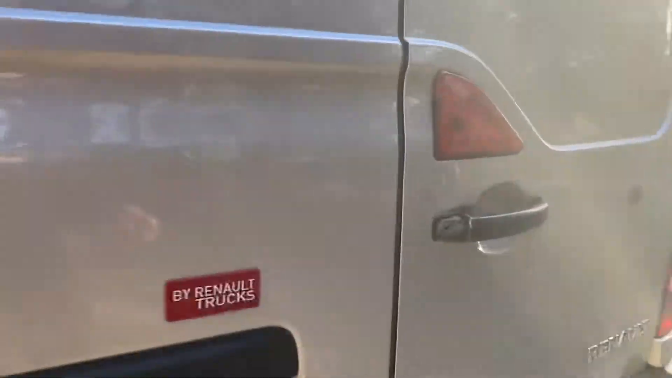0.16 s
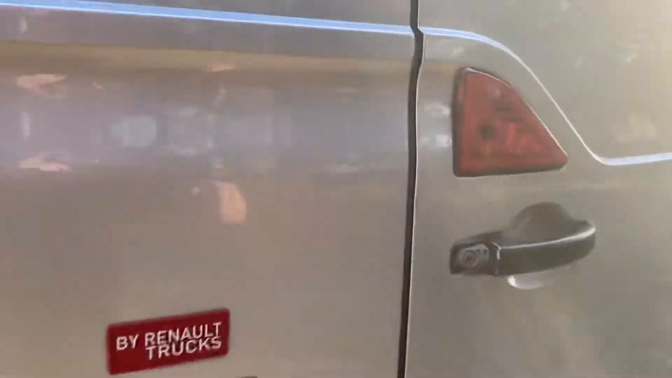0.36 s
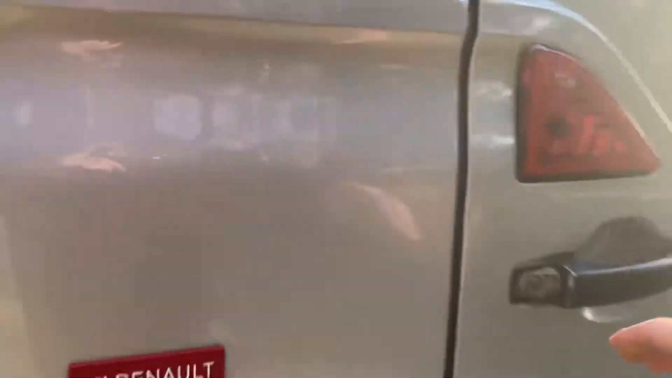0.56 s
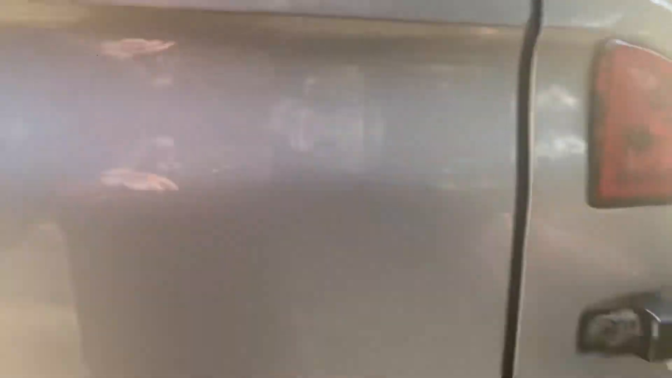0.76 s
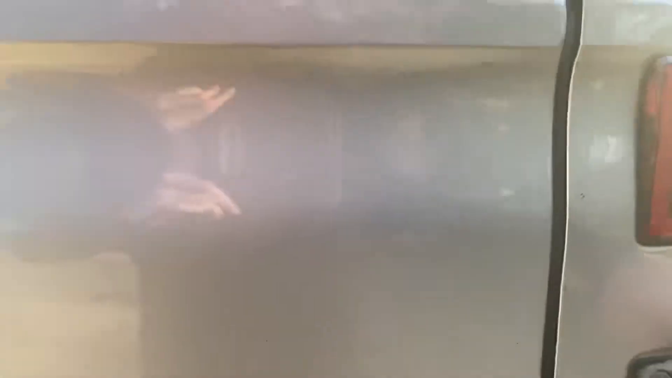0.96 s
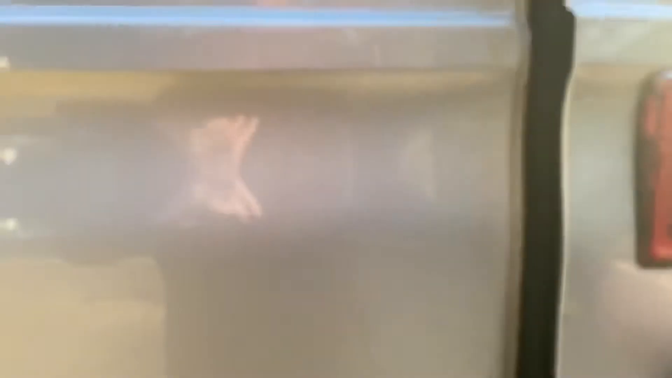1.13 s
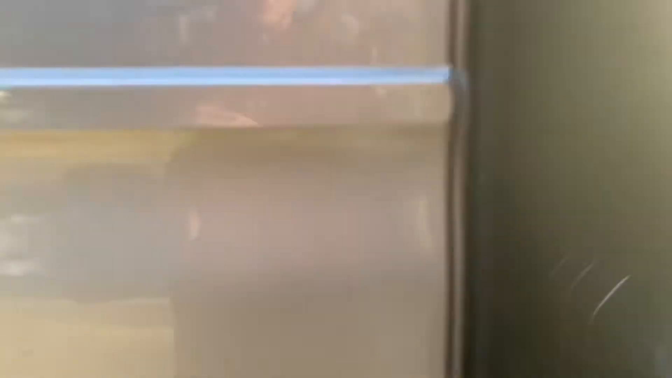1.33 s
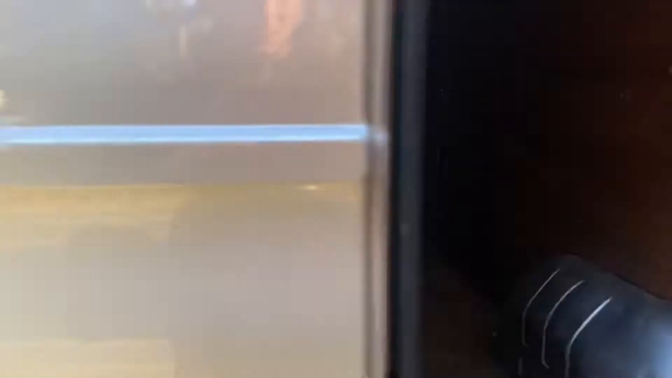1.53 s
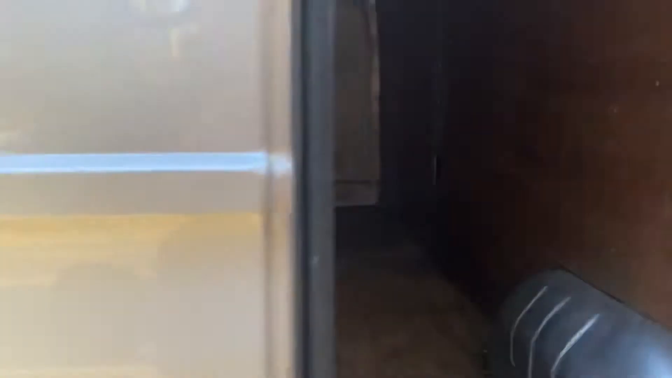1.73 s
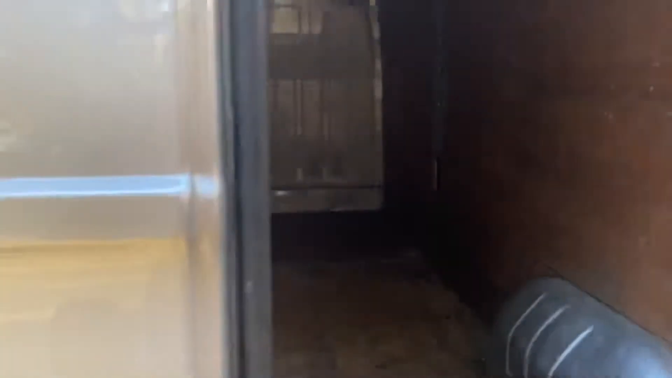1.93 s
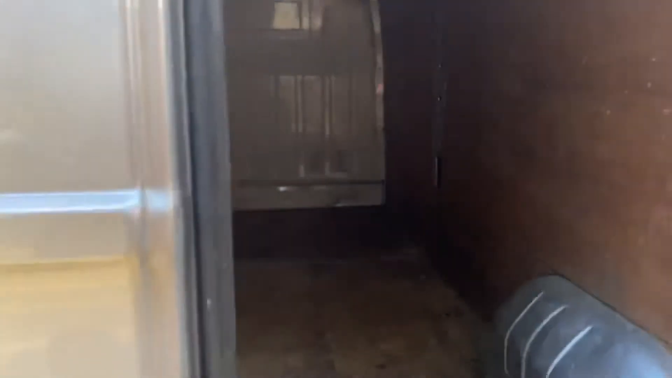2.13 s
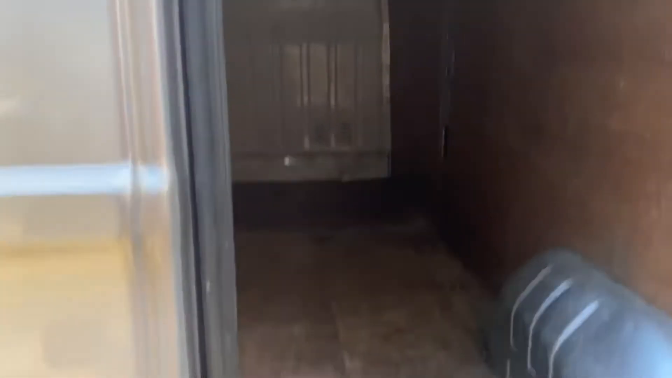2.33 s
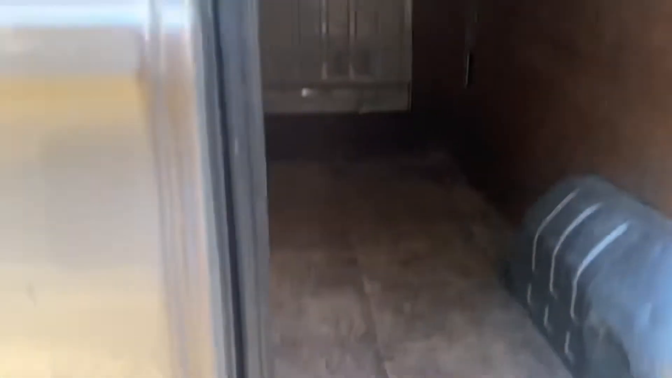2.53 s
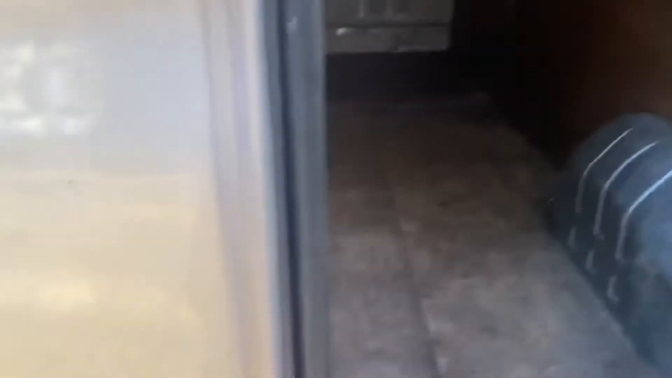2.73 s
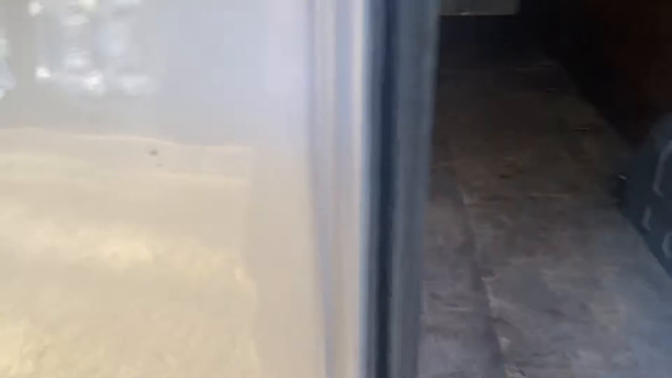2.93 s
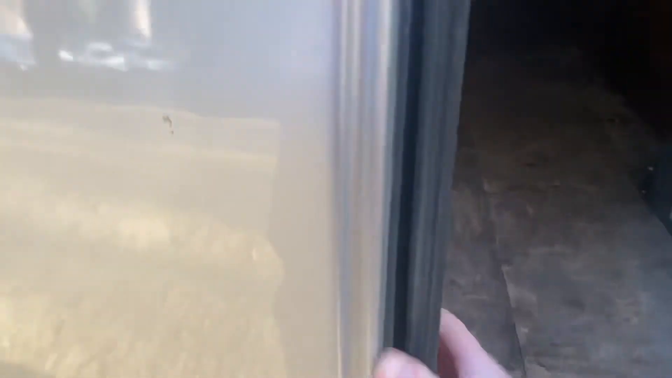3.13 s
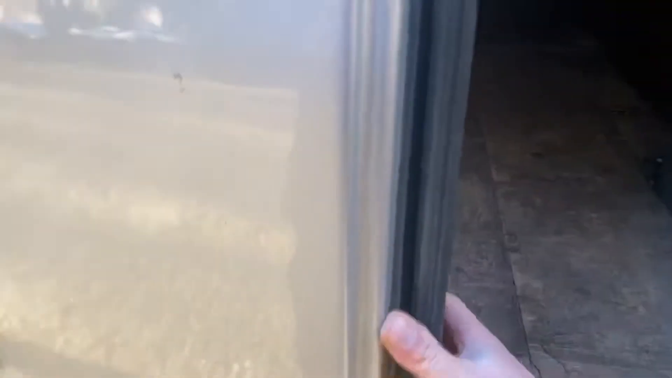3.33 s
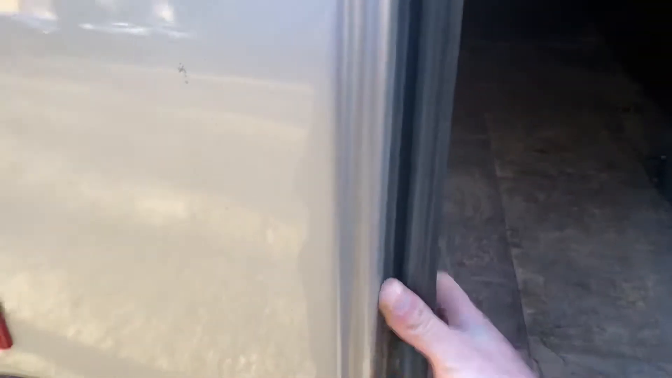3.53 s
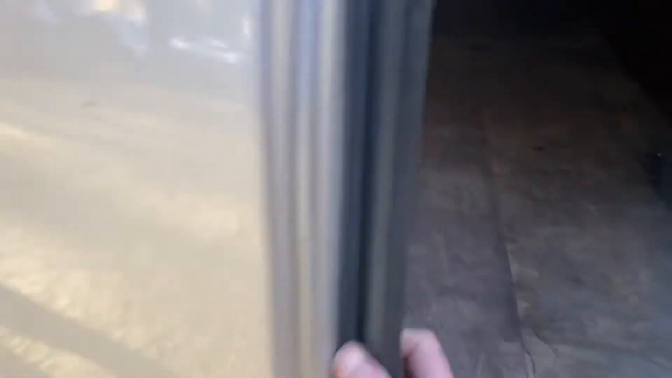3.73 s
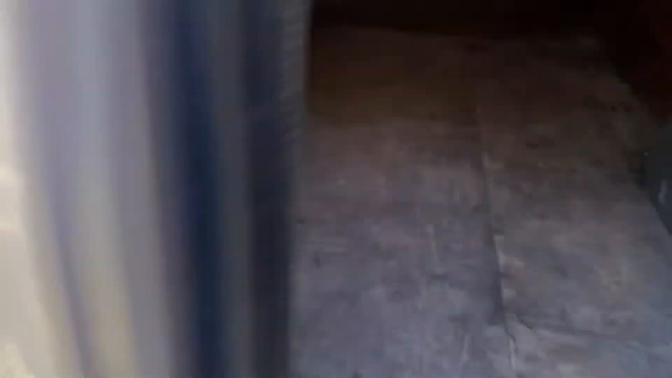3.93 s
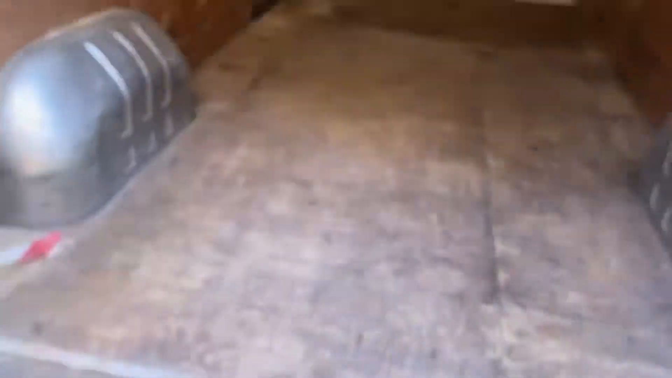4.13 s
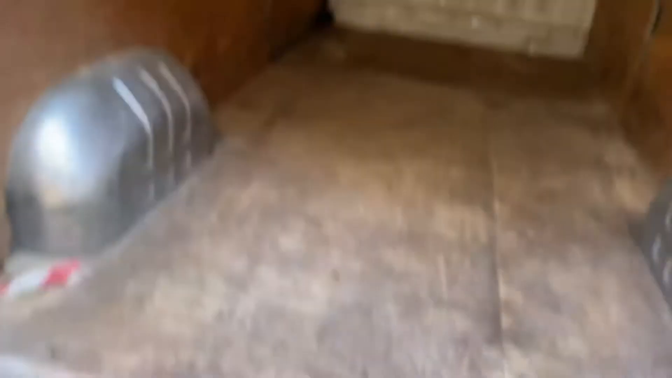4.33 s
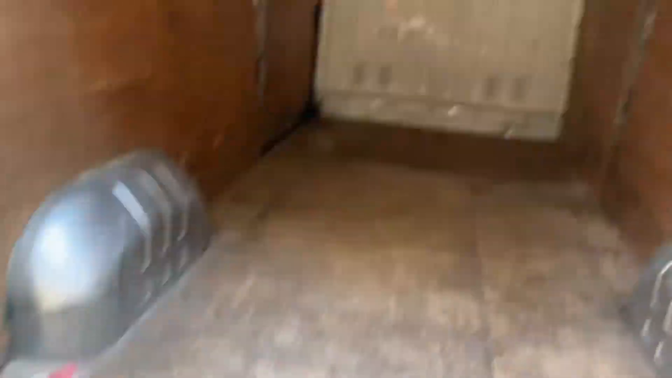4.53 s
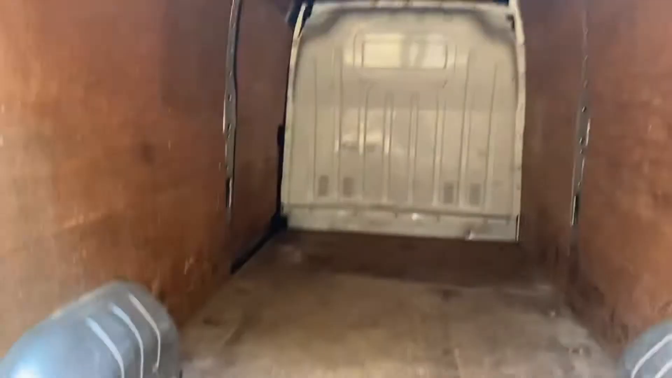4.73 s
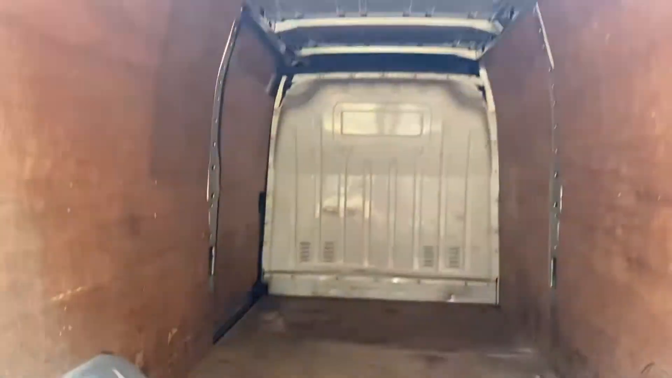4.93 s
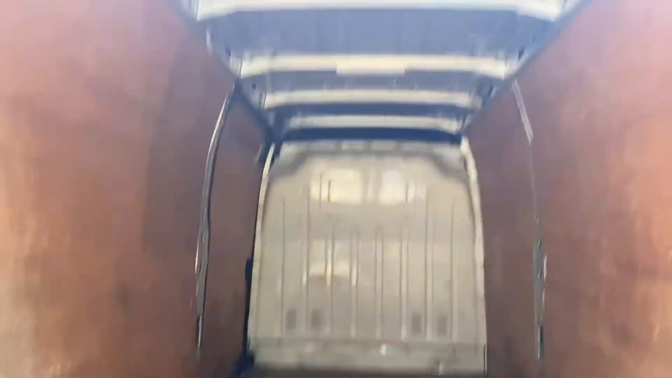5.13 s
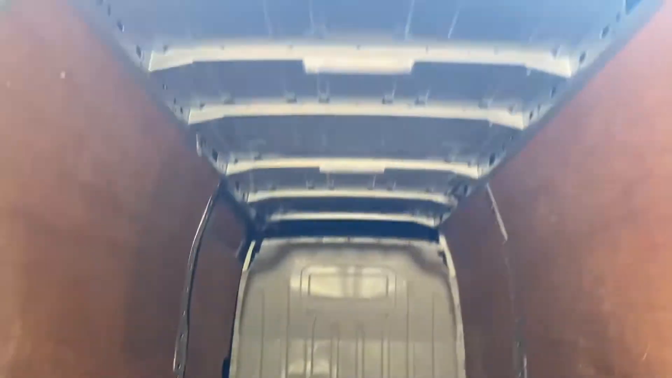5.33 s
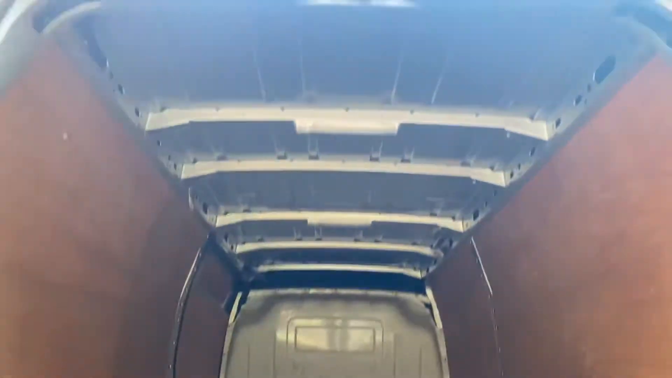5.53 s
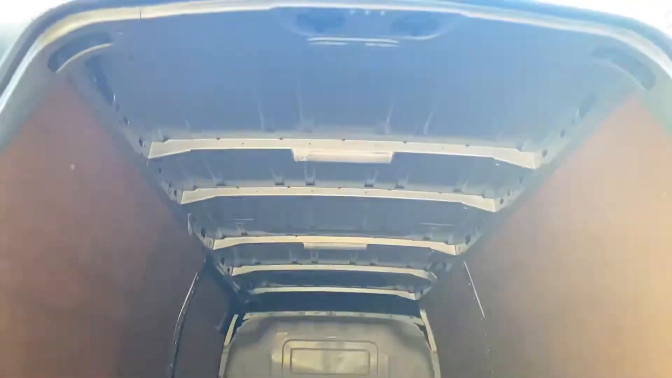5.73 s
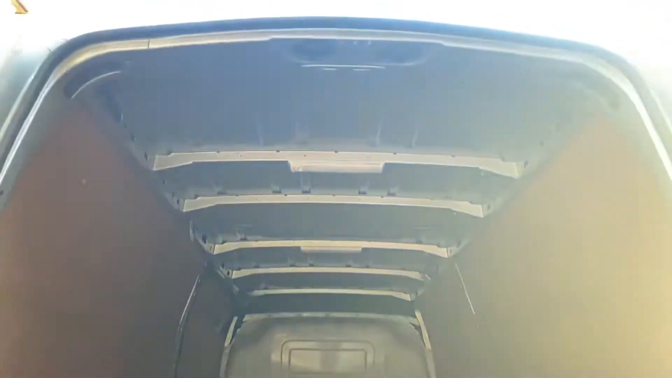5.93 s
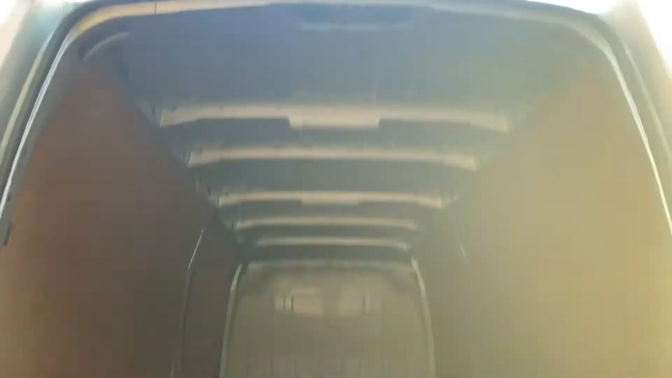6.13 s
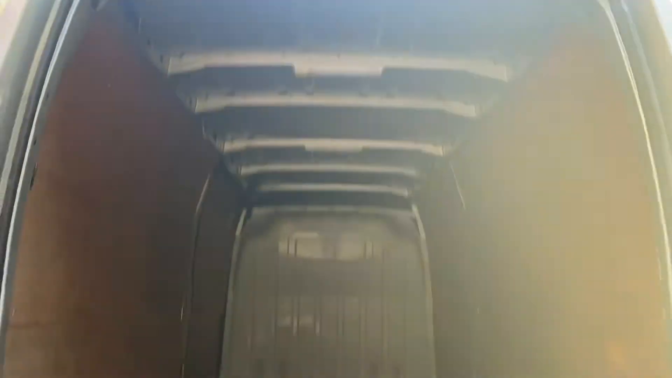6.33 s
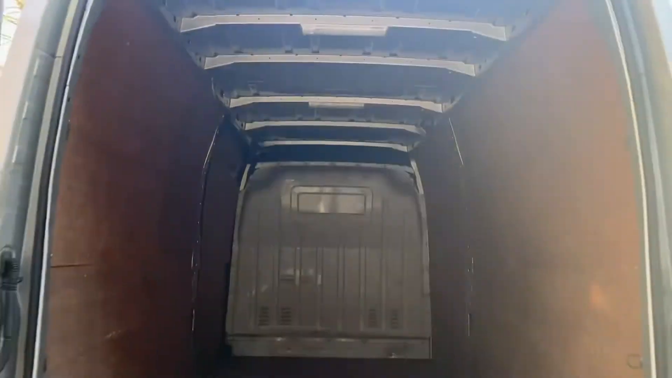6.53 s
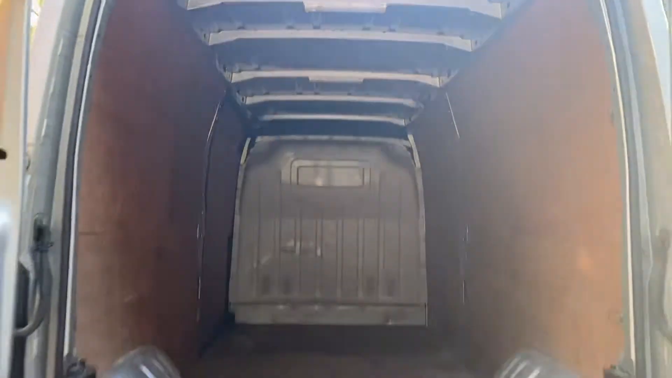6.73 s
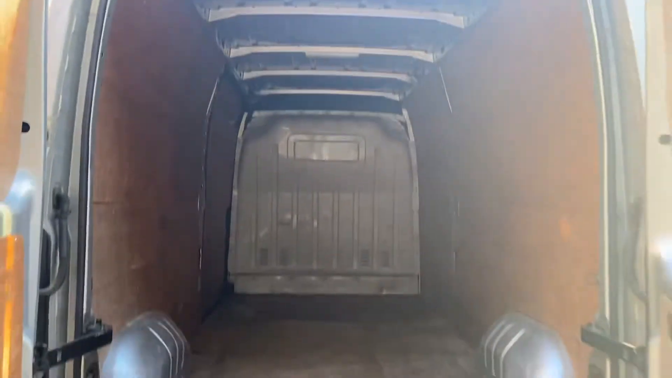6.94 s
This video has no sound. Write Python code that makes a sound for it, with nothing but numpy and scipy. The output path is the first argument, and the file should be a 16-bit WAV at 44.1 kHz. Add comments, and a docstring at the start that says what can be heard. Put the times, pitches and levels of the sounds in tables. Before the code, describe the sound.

Hand-held stereo microphone close to a van's rear doors outside. Faint clicking and rustling, a short dry squeak, then the first door unlatches with a heavy boomy clunk. Low wind buffets the microphone and dies down. The second door's latch snaps brightly, another clunk comes less than a second later, followed by dragging rubs, soft knocks, tiny ticks and a shoe scuff, with low far traffic beneath.

```python
"""Outdoors, close to a hand-held stereo microphone: the two rear doors of an empty van are unlatched and opened.
Handles tick over a low rustle, then the first latch lets go near 1 s with a puff of air; panels and bay ring.
Near 2 s wind thumps and flaps on the microphone; the second clunk at 3.4 s sets a lock part jingling.
A third clunk follows at 4.2 s, then ticks, rubbing and a sole scuffing grit; wind and far traffic lie under it all.
Hard parts are decaying sines, rubs and air are shaped noise; all levels are relative, ahead of trims and record()."""
import sys
import numpy as np
from scipy import signal
from scipy.io import wavfile

SR = 44100
rng = np.random.default_rng(int(sys.argv[2]) if len(sys.argv) > 2 else 0)


def transcribe(u):
    """Save the signal u as a 16-bit wav file named by the first command-line argument.

    u: samples, shape (n,) or (channels, n), limited to [-1, 1]; the rate is SR.
    q: integer samples, one column per channel.
    """
    v = np.clip(np.atleast_2d(u).T, -1, 1)
    q = np.round(v * 32767).astype(np.int16)
    wavfile.write(sys.argv[1], SR, q)


N = 307619
TIME = np.arange(N) / SR


def from_db(db):
    """Decibels to gain."""
    return 10 ** (np.asarray(db) / 20)


def rms_one(x):
    """Scale to unit power."""
    return x / np.sqrt(np.mean(x ** 2) + 1e-20)


def at_hz(points, hz):
    """Read a table on a log-frequency axis."""
    f, value = np.transpose(points)
    return np.interp(np.log(hz), np.log(f), value)


def add(out, s, sound):
    """Mix a sound in at time s."""
    i = int(s * SR)
    out[:, i:i + sound.shape[-1]] += sound[..., :N - i]


def drift(rate):
    """Random wander of unit power, with `rate` new values per second joined by straight lines."""
    knots = rng.standard_normal(4000)
    return rms_one(np.interp(TIME * rate, np.arange(len(knots)), knots))


def swell(peak_s, rise_s, fall_s):
    """A gain that climbs to 1 and sinks again, by 20 dB in each rise or fall time."""
    return from_db(-20 * np.maximum((peak_s - TIME) / rise_s, (TIME - peak_s) / fall_s))


def ring(t, hz, t60):
    """A struck mode: a sine that loses 60 dB in t60 seconds."""
    return np.sin(2 * np.pi * hz * t) * from_db(-60 * t / t60)


def wavering_tone(hz):
    """A sine that follows a changing pitch."""
    return np.sin(2 * np.pi * np.cumsum(hz) / SR)


# third-octave band centres [Hz]
CENTRES = 25 * 2 ** (np.arange(29) / 3)


def noise(colour, width, size, envelope=lambda hz: 1):
    """Stereo noise in third octaves, each under its own envelope; the middle has unit power at envelope 1."""
    lowest, highest = colour[0][0] * 0.85, colour[-1][0] * 1.15
    centres = CENTRES[(CENTRES > lowest) & (CENTRES < highest)]
    white = rng.standard_normal((2, 2, size))   # neighbouring bands take turns with two independent pairs
    out, power = np.zeros((2, size)), 0
    for k, hz in enumerate(centres):
        low, high = hz * 2 ** (-1 / 6), hz * 2 ** (1 / 6)
        gain = from_db(at_hz(colour, hz))
        band = signal.butter(2, [low, high], "band", fs=SR, output="sos")
        mid, side = signal.sosfilt(band, white[k % 2] * envelope(hz) + 1e-18) * gain
        side = side * from_db(at_hz(width, hz))
        out += [mid + side, mid - side]
        power += gain ** 2 * (high - low) * 2 / SR
    return out / np.sqrt(power)


# modes of the struck steel panels, one list per clunk: (frequency [Hz], level [dB])
PANELS = [
    [(355, -6.5), (424, 2.5), (562, -13.5), (705, -1), (899, -2), (1070, 3), (1190, -28), (1836, -9)],
    [(829, -5), (1136, -8.5), (1229, -12), (1297, -19), (1389, -8), (1583, -7), (1920, -34), (2099, -14),
     (2417, -15), (3018, -17)],
    [(791, -11), (872, 0), (1070, -4.5), (1357, -17), (1440, -4.5), (1818, -9), (1990, -1.5), (2468, -7),
     (2896, -19), (3192, -16)],
]
BOTH_DOORS = PANELS[0] + PANELS[1]


def panel(modes, t60, uneven_db=5.5):
    """Struck sheet steel: its modes set in one after another and reach each port by their own path."""
    out = 0
    for hz, db in modes:
        lag = rng.uniform(0, 0.00368) + rng.uniform(0, 0.00065, (2, 1))   # s, shared and per port
        gain = from_db(db + uneven_db * rng.standard_normal((2, 1)))
        out = out + gain * ring(np.maximum(TIME[:SR] - lag, 0), hz, t60)
    return out


# the three clunks: (time [s], clatter level [dB], clatter decay t60 [s], body level [dB],
#                    factor on the bay's t60, panel level [dB], lingering ring against the body [dB])
CLUNKS = [(0.998, -1, 0.096, -11.5, 0.55, -26.5, -12), (3.4491, -11, 0.087, -11, 0.77, -19.5, -22),
          (4.2190, -9, 0.044, -12, 0.49, -23.5, -26)]
# colour of the clatter, one list per clunk: (frequency [Hz], density [dB per Hz])
CLATTER_COLOUR = [
    [(35, -27), (60, -1), (189, 1.5), (800, -19.5), (1200, -12.5), (1800, -24), (3040, -31.5), (3760, -44),
     (4750, -43), (15000, -56)],
    [(60, -18), (100, 4), (470, 2), (620, 1), (1400, -3), (2270, -2.5), (3120, -13), (7100, -37),
     (10000, -25.5), (15000, -27)],
    [(90, -6), (150, -41), (466, 1.5), (1260, -28), (1530, -10.5), (3040, -15), (7000, -33.5), (10600, -29),
     (15000, -36)],
]
# colour of the body's ring, one list per clunk: (frequency [Hz], density [dB per Hz])
BODY_COLOUR = [
    [(30, -35), (45, -2), (155, 0), (354, -17), (615, -22), (770, -20), (1900, -23.5), (2600, -36),
     (4800, -47), (15000, -96)],
    [(35, -14), (118, -5), (297, -3.5), (600, -20.5), (1410, -12), (1680, -21), (2380, -20), (3830, -41.5),
     (6170, -34.5), (8000, -46.5), (10200, -42.5), (15000, -70)],
    [(60, -33), (100, -60), (249, -2), (676, -20.5), (800, -15.5), (2000, -18), (5530, -35), (9200, -42),
     (15000, -54)],
]
# decay of the empty cargo bay, before each clunk's factor: (frequency [Hz], t60 [s])
BAY_T60 = [(150, 0.9), (300, 0.4), (700, 0.7), (1800, 0.51), (5000, 0.48), (14000, 0.63)]
# stereo width of the doors, also used for handling and the far hiss: (frequency [Hz], side against mid [dB])
DOOR_WIDTH = [(60, -24), (200, -14.5), (380, -9.5), (700, -1.5), (1300, -4.5), (2400, -5), (5000, -1),
              (9000, -8)]


def clunks(build_s=0.02, late_t60=1.58, rattle_db=1.5, shudder_db=0.5, attack_s=0.00052, panel_t60=0.36):
    """A short clatter of lock parts, then the door skin and the cargo bay ring on."""
    out, t = np.zeros((2, N)), TIME[:SR]
    for row, clatter_colour, body_colour, modes in zip(CLUNKS, CLATTER_COLOUR, BODY_COLOUR, PANELS):
        s, clatter_db, clatter_t60, body_db, scale, panel_db, late_db = row
        # loose rods chatter, the door shudders
        loose = from_db(rattle_db * drift(199.6)[:SR] + shudder_db * drift(68.0)[:SR])

        snap = loose * (1 - np.exp(-t / attack_s)) * from_db(-60 * t / clatter_t60)
        clatter = noise(clatter_colour, DOOR_WIDTH, SR, lambda hz: snap)
        add(out, s, from_db(clatter_db) * clatter)

        build = loose * (1 - np.exp(-t / build_s))   # reflections take a moment to fill the bay
        late = from_db(late_db - 60 * t / late_t60)

        def bay_decay(hz):
            """The bay's decay in one band, over a slower faint tail."""
            return build * (from_db(-60 * t / (scale * at_hz(BAY_T60, hz))) + late)

        add(out, s, from_db(body_db) * noise(body_colour, DOOR_WIDTH, SR, bay_decay))
        add(out, s, from_db(panel_db) * panel(modes, panel_t60))
    return out


# hard contacts, and a low boom of the door skin after the first:
# (time [s], level [dB], frequency [Hz], decay t60 [s])
CONTACTS = [(0.996, 5.5, 830, 0.0023), (1.0026, -7, 1196, 0.062), (1.0045, -5, 1870, 0.01),
            (1.0034, -12.5, 3800, 0.0076), (1.0095, -3, 168, 0.1), (1.046, -8, 344.5, 0.088),
            (3.453, 4.5, 1190, 0.016), (3.455, -12, 3070, 0.026), (3.462, -11, 1340, 0.037),
            (3.478, -15, 1110, 0.021), (4.2224, -17.5, 3600, 0.017), (4.2226, -14, 435.4, 0.23),
            (4.245, -22, 2460, 0.05)]


def contacts(level_db=-1):
    """Steel meets steel: each hard contact, and the door skin's low boom, is a set of single damped tones."""
    out = np.zeros((2, N))
    for s, db, hz, t60 in CONTACTS:
        add(out, s, from_db(db + level_db) * ring(TIME[:SR // 2], hz, t60))
    return out


# modes of a loose lock part: (frequency [Hz], level [dB])
JINGLE_MODES = [(6080, 2), (6330, -1), (9930, -7), (10170, 3), (10410, -10)]
# its bounces after the second latch: (time [s], level [dB], tilt [dB per octave])
BOUNCES = [(3.494, -45, -7), (3.517, -38.5, -11), (3.534, -44, 6), (3.546, -42, 6), (3.562, -42, 5)]


def jingle(t60=0.08, detune=0.009):
    """A small steel part rings anew at each bounce, with another balance of its modes."""
    out, t = np.zeros((2, N)), TIME[:SR // 8]
    for s, bounce_db, tilt in BOUNCES:
        for hz, db in JINGLE_MODES:
            level = bounce_db + db + tilt * np.log2(hz / 8000) + rng.standard_normal((2, 1))
            add(out, s, from_db(level) * ring(t, hz * (1 + detune * rng.standard_normal()), t60))
    return out


def shaded(x, loss_db=-2, centre_hz=750, q=0.43):
    """The left port gets less of the doors' middle range."""
    left, right = x
    middle = signal.lfilter(*signal.iirpeak(centre_hz, q, fs=SR), left)
    return np.array([left + (from_db(loss_db) - 1) * middle, right])


# handle, lock rod and hinge ticks: (time [s], level [dB], brightness before scaling by a tilt [dB])
TICKS = [(0.317, -28.5, -16), (0.408, -38.5, -25), (0.454, -37.5, -19), (0.5266, -37.5, -18),
         (0.7146, -36.5, -15), (0.8852, -34.5, -5), (0.93, -32, -18), (1.177, -43, -9),
         (1.3326, -39.5, -22), (1.6018, -32, -16.5), (2.0599, -45, -5), (2.3536, -36, -17.5),
         (2.9854, -41.5, -24.5), (3.4067, -38.5, -28.5), (3.751, -40.5, -15), (3.7878, -37, -17),
         (4.0531, -38, -21), (4.3786, -37, -3), (4.648, -43, 4.5), (4.8736, -47.5, -5), (6.078, -43, -28),
         (6.212, -46, -31), (6.318, -45, -14), (6.5857, -41.5, -11), (6.6118, -40, -5.5)]
# colour of the ticks: (frequency [Hz], density [dB per Hz])
TICK_COLOUR = [(400, 4), (1200, -0.5), (2200, -1), (3300, 1.5), (5500, 9), (8000, 3.5), (10500, 4.5),
               (15000, -13)]


def ticks(level_db=-1, snap_t60=0.032, tail_db=-22, tail_t60=0.64,
          tilt=0.86, neutral_db=-7, pivot_hz=4500, uneven_db=2.5):
    """Small dry snaps, each with its own brightness and a faint ring of the van."""
    t = TIME[:SR // 4]
    fade = from_db(-60 * t / snap_t60) + from_db(tail_db - 60 * t / tail_t60)

    def strength(hz):
        """All snaps as heard in one band."""
        track = np.zeros((1, N))
        for (s, db, bright), chance in zip(TICKS, rng.standard_normal(len(TICKS))):
            treble_db = tilt * (bright - neutral_db) * np.tanh(np.log2(hz / pivot_hz))
            add(track, s, fade * from_db(db + level_db + treble_db + uneven_db * chance))
        return track

    return noise(TICK_COLOUR, DOOR_WIDTH, N, strength)


def pings(level_db=-10, low_hz=2500, high_hz=11000, t60=0.031, tilt=0.28, count=5):
    """Each small part that snaps also rings briefly at a few pitches of its own."""
    out, t = np.zeros((2, N)), TIME[:SR // 8]
    for (s, db, bright), places in zip(TICKS, rng.random((len(TICKS), count))):
        for place in places:   # 0 is the lowest pitch, 1 the highest
            hz = low_hz * (high_hz / low_hz) ** place
            lag = rng.uniform(0, 0.0001, (2, 1))   # s, per port
            gain = from_db(db + level_db + tilt * place * bright)
            add(out, s, gain * ring(np.maximum(t - lag, 0), hz, t60))
    return out


# bumps on the doors: (time [s], level [dB])
TOUCHES = [(1.803, -42.5), (2.486, -44.5), (2.587, -45), (2.927, -46.5), (3.247, -39), (4.412, -45),
           (4.469, -44), (4.497, -36), (4.568, -39)]


def touches(damped_t60=0.067):
    """A hand or the stay bumps a door, which is held and rings only briefly."""
    out = np.zeros((2, N))
    for s, db in TOUCHES:
        add(out, s, from_db(db) * panel(BOTH_DOORS, damped_t60))
    return out


# strokes of sleeves, seals and soles: (start [s], length [s], level at the start [dB], loss by the end [dB])
STROKES = [(0.363, 0.28, -54.5, 3.5), (0.778, 0.63, -54.5, 5.5), (1.525, 0.43, -56, 5.5),
           (2.06, 0.54, -55, -0.5), (2.586, 0.23, -61, 3.5), (2.97, 0.11, -61, 0.5),
           (3.418, 0.16, -55, -10.5), (3.787, 0.14, -45.5, 15.5), (3.933, 0.25, -57, -9),
           (4.398, 0.17, -38.5, 6), (4.563, 0.38, -47.5, 14.5), (4.71, 0.037, -50.5, -3.5),
           (6.06, 0.11, -56.5, 11), (6.417, 0.19, -45, 26)]


def rub_effort(attack_s=0.033, release_s=0.088, rustle_db=-66, rustle_fade_db_per_s=1.4):
    """Each stroke grips quickly, changes level as it slides and lets go, over rustling clothes: level in dB."""
    power = from_db(rustle_db - rustle_fade_db_per_s * TIME) ** 2
    for s, length, db, lost_db in STROKES:
        # attack and release are times per 20 dB
        outside = np.maximum((s - TIME) / attack_s, (TIME - s - length) / release_s)
        sliding_db = db - lost_db * np.clip((TIME - s) / length, 0, 1)
        power = power + from_db(sliding_db - 20 * np.maximum(outside, 0)) ** 2
    return 10 * np.log10(power)


def snags(lowest_db=4, spread_db=6, snag_t60=0.02, count=150):
    """Now and then a rubbing surface catches and snaps free: a gain on the rubbing."""
    track = np.ones((1, N))
    for place, size in rng.random((count, 2)):
        add(track, place * N / SR, from_db(lowest_db + spread_db * size - 60 * TIME[:SR] / snag_t60))
    return rms_one(track)


def through_panel(x, sing_db=4, width_hz=22):
    """Narrow resonances at the door modes: a rub on the door sets its skin singing."""
    singing = sum(signal.lfilter(*signal.iirpeak(hz, hz / width_hz, fs=SR), x) for hz, _ in BOTH_DOORS)
    return rms_one(x + from_db(sing_db) * singing)


# a low rustle first, then a door drags on its seal, bolt or stay:
# (peak time [s], rise per 20 dB [s], fall per 20 dB [s], level [dB])
RUSTLE_AND_DRAGS = [(.43, 0.16, 0.7, -44.5), (0.978, 0.074, 0.13, -31.5), (2.185, 0.12, 0.097, -41.5),
                    (3.441, 0.04, 0.056, -31.5), (4.511, 0.053, 0.11, -28)]
# colours of cloth, of low rustle and drags, and of a scuffing sole: (frequency [Hz], density [dB per Hz])
RUB_COLOUR = [(2000, -19), (2900, -3), (5000, -8), (7000, -9), (10400, -16.5), (13500, -25), (16000, -25)]
DRAG_COLOUR = [(300, 1.5), (560, 7), (900, -2), (1650, -11), (2100, -6.5), (2900, -5.5), (4000, -11)]
SCUFF_COLOUR = [(400, -16), (700, 10), (1100, -47)]


def rubbing(grain_db=1.5, brighten=0.23, light_db=-60, scuff_db=-41.5):
    """Cloth, rubber and soles slip in tiny uneven catches; harder rubbing of cloth is brighter."""
    grain = rms_one(from_db(grain_db * drift(350)))
    effort = rub_effort()

    def brightness(hz):
        """Treble tilt about 5 kHz that grows with effort above light_db."""
        return from_db(brighten * np.maximum(effort - light_db, 0) * np.log2(hz / 5000))

    cloth = from_db(effort) * snags() * noise(RUB_COLOUR, DOOR_WIDTH, N, brightness)
    strength = sum(from_db(db) * swell(s, rise, fall) for s, rise, fall, db in RUSTLE_AND_DRAGS)
    low_rub = strength * through_panel(through_panel(noise(DRAG_COLOUR, DOOR_WIDTH, N)))
    # a sole scuffs on grit: peak, rise and fall in s
    sole = from_db(scuff_db) * swell(6.232, 0.23, 0.2) * noise(SCUFF_COLOUR, DOOR_WIDTH, N)
    return grain * (cloth + low_rub + sole)


# latch spring and hinge: (time [s], length [s], frequency [Hz], second partial [Hz], level [dB],
#                          pitch waver [share])
SQUEAKS = [(0.89, 0.13, 4490, 6800, -46.5, .01), (1.119, 0.057, 4730, 6830, -48, 0.006),
           (1.147, 0.11, 4670, 6800, -57, 0.0063), (6.2, 0.07, 4080, 3700, -53, .1)]


def squeaks(second_db=-7):
    """Dry steel sings on two unsteady partials as it is loaded and let go."""
    out = np.zeros((2, N))
    for s, length, hz, second_hz, db, waver in SQUEAKS:
        load = np.sin(np.pi * np.clip((TIME - s) / length, 0, 1))
        for f, partial_db in ((hz, 0), (second_hz, second_db)):
            out += from_db(db + partial_db) * load * wavering_tone(f * (1 + waver * drift(550)))
    return out


# soft knocks and, near 2 s, the higher flap of wind thumps on the microphone: (time [s], level [dB])
KNOCKS_AND_FLAPS = [(1.829, -20), (1.872, -22), (2.003, -20), (2.084, -30), (3.248, -32), (3.788, -28),
                    (3.943, -24), (5.003, -28), (5.18, -24), (5.235, -28), (5.654, -29), (5.834, -32),
                    (6.556, -27)]
# their modes, before a random detuning: (frequency [Hz], level [dB], decay t60 [s])
KNOCK_MODES = [(320, -1, .035), (490, -1, .03), (670, -3, .03)]


def knocks_and_flaps(onset_s=0.0008, detune=0.09):
    """Dull, soft knocks and wind flaps: three damped modes that ring for a few cycles."""
    out, t = np.zeros((2, N)), TIME[:SR // 8]
    for s, db in KNOCKS_AND_FLAPS:
        for k, (hz, mode_db, t60) in enumerate(KNOCK_MODES):
            gain = (-1) ** k * from_db(db + mode_db + rng.normal(0, 1, (2, 1)))
            tone = ring(t, hz * (1 + detune * rng.standard_normal()), t60)
            add(out, s, gain * (1 - np.exp(-t / onset_s)) * tone)
    return out


# single eddies that thump on the ports: (time [s], level [dB], frequency [Hz])
THUMPS = [(1.572, -18, 175), (1.675, -18, 190), (1.812, -14, 115), (1.832, -15, 260), (1.853, -11, 150),
          (1.888, -10, 210), (1.908, -9, 90), (1.951, -8, 110), (2.007, -8, 170), (2.021, -11, 125),
          (4.196, -13, 142), (5.104, -18, 106)]


def thumps(cycles=0.87):
    """An eddy pushes and pulls on the ports for a cycle or two."""
    out = 0
    for s, db, hz in THUMPS:
        t = TIME - s
        out = out + from_db(db) * np.sin(2 * np.pi * hz * t) * np.exp(-(t * hz / cycles) ** 2)
    return out


# the low end dips twice, rumble and hum together: (middle [s], half length [s], depth [dB])
LOW_DIPS = [(2.708, 0.63, -14), (5.335, 0.15, -12)]


def low_dips():
    """Gain shared by the steady wind rumble and the hum: the low end dips and returns."""
    return from_db(sum(db * np.exp(-((TIME - s) / half) ** 4) for s, half, db in LOW_DIPS))


# gusts, and near 1 s a puff of air pushed by the opening door:
# (peak time [s], rise per 20 dB [s], fall per 20 dB [s], buffet level [dB], flutter level [dB])
GUSTS_AND_PUFF = [(1.011, 0.051, 0.17, -17, -9.5), (1.4, 0.81, 0.39, -39, -26.5),
                  (1.66, 0.28, 0.18, -24.5, -26), (1.899, 0.32, 0.28, -14, -20),
                  (2.2, 0.43, 0.14, -23, -48), (3.5, 0.72, 1, -27.5, -34), (4.3, 0.96, 0.75, -36, -22.5),
                  (4.73, 0.37, 0.4, -19.5, -74), (5.1, 0.11, 0.051, -21, -42), (5.62, 0.22, 0.93, -48, -71),
                  (6.25, 0.43, 0.9, -33.5, -41)]


def wind_strength(breeze_buffet_db=-33.5, breeze_flutter_db=-46.5, calming_db_per_s=1.27):
    """A slowly dying breeze, the gusts and the door's puff add in power: levels of buffet and flutter in dB."""
    breeze = low_dips() * from_db([[breeze_buffet_db], [breeze_flutter_db]] - calming_db_per_s * TIME)
    power = breeze ** 2
    for s, rise, fall, buffet_db, flutter_db in GUSTS_AND_PUFF:
        push = from_db([[buffet_db], [flutter_db]]) * swell(s, rise, fall)
        power = power + push ** 2
    return 10 * np.log10(power)


# colours of large and small eddies: (frequency [Hz], density [dB per Hz])
BUFFET_COLOUR = [(30, -36), (41, -10), (59, 3.5), (130, -3), (170, -34.5)]
FLUTTER_COLOUR = [(100, -5), (150, 4.5), (240, 0.5), (350, -6.5), (500, -20.5), (800, -30)]
# stereo width of the wind: (frequency [Hz], side against mid [dB])
WIND_WIDTH = [(150, -11.5), (600, -6.5)]


def wind(buffet_trim_db=-2, flutter_trim_db=-1, brighten=0.033, calm_db=-34):
    """Moving air on the ports: large eddies rumble, small ones flutter and reach higher when it is strong."""
    buffet, flutter = wind_strength()

    def brightness(hz):
        """Tilt about 220 Hz that grows with flutter above calm_db."""
        return from_db(brighten * np.maximum(flutter - calm_db, 0) * np.log2(hz / 220))

    low = from_db(buffet + buffet_trim_db) * noise(BUFFET_COLOUR, WIND_WIDTH, N)
    high = from_db(flutter + flutter_trim_db) * noise(FLUTTER_COLOUR, WIND_WIDTH, N, brightness)
    flicker = rms_one(from_db(2 * drift(45)))
    return low + high * flicker + thumps()


# colours of the far wash and the far hiss: (frequency [Hz], density [dB per Hz])
AIR_COLOUR = [(200, -2), (262, -7), (403, -4), (500, -8), (650, -2), (820, -8), (1420, -11), (2010, -9),
              (2600, -20), (4000, -42), (8000, -57)]
HISS_COLOUR = [(3200, -1), (4800, -13), (6400, -4.5), (10000, -15.5)]
# stereo width of the wash: (frequency [Hz], side against mid [dB])
AIR_WIDTH = [(200, -11.5), (380, -8), (700, 5), (1290, 4.5), (2380, -8), (4400, 8.5)]


def street(air_db=-49, hum_hz=55, hum_db=-35, fade_db_per_s=0.5, whine_hz=1990, whine_db=-63, hiss_db=-63):
    """Far traffic: an even wash, a low uneven engine note, a wavering whine and a passing hiss."""
    # each band of the wash flickers by itself
    air = from_db(air_db) * noise(AIR_COLOUR, AIR_WIDTH, N, lambda hz: from_db(1.3 * drift(25)))

    hum_gain = low_dips() * from_db(hum_db - fade_db_per_s * TIME + 2 * drift(7))
    hum = hum_gain * wavering_tone(hum_hz * (1 + 0.053 * drift(8.8)))

    whine_gain = from_db(whine_db + 1.5 * drift(10))
    whine = whine_gain * wavering_tone(whine_hz * (1 + 0.02 * drift(300)))

    # the hiss swells and fades: peak, rise and fall in s
    hiss = from_db(hiss_db) * swell(5.7, 0.43, 0.79) * noise(HISS_COLOUR, DOOR_WIDTH, N)

    # wash and whine ease by 2 dB around 2.55 s
    eased = from_db(-2 * np.exp(-((TIME - 2.55) / 0.94) ** 2))
    return eased * (air + whine) + hum + hiss


def scene(door_db=1.48, hand_pan_db=0.5):
    """The doors clunk; small handling sounds, wind and street lie around them."""
    doors = from_db(door_db) * shaded(clunks() + contacts() + jingle())
    handling = ticks() + pings() + touches() + rubbing() + squeaks()
    handling = handling * from_db([[hand_pan_db], [-hand_pan_db]])   # slightly to the left
    return doors + handling + knocks_and_flaps() + wind() + street()


def record(dry, cutoff_hz=15500):
    """The left port turns the phase of the treble at its resonances; peaks are rounded and the top is cut."""
    left, right = dry
    for hz in (8550, 12250):
        # twice a notch less the input is an all-pass
        left = 2 * signal.lfilter(*signal.iirnotch(hz, 6, fs=SR), left) - left
    rounded = 1.11 * np.tanh(np.array([left, right]) / 1.539)
    top_cut = signal.ellip(10, 0.3, 80, cutoff_hz, fs=SR, output="sos")
    return signal.sosfilt(top_cut, rounded)


dry = scene()
out = record(dry)
transcribe(out)
```